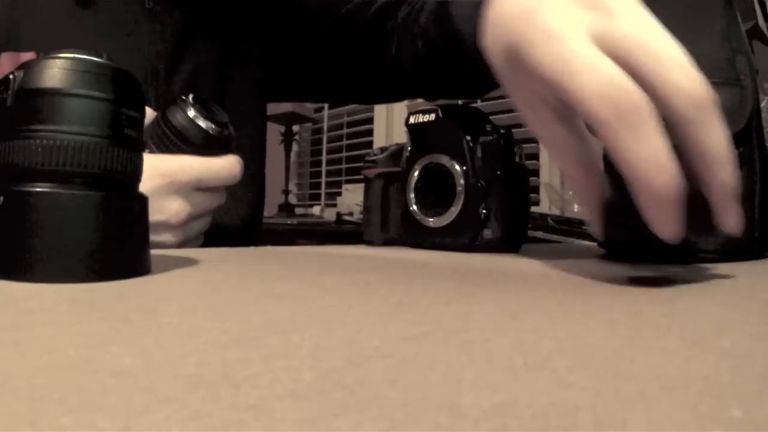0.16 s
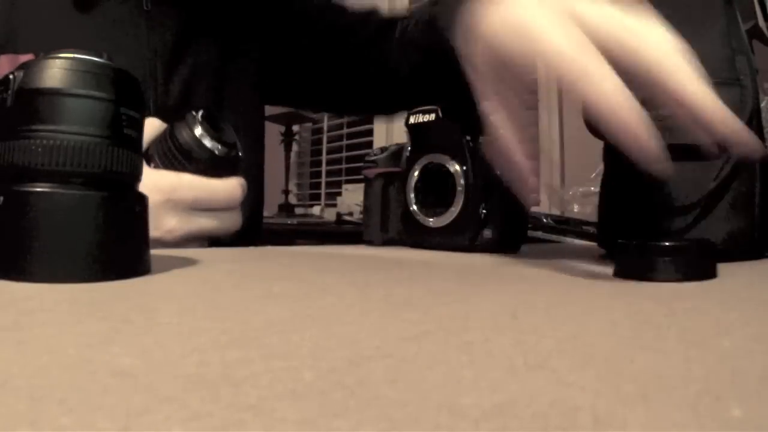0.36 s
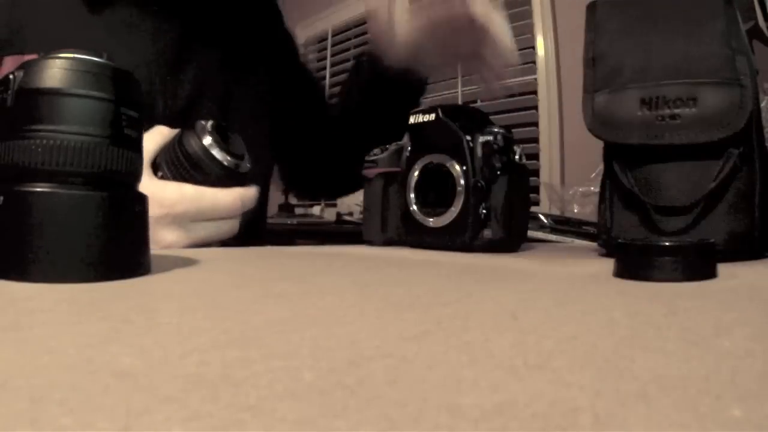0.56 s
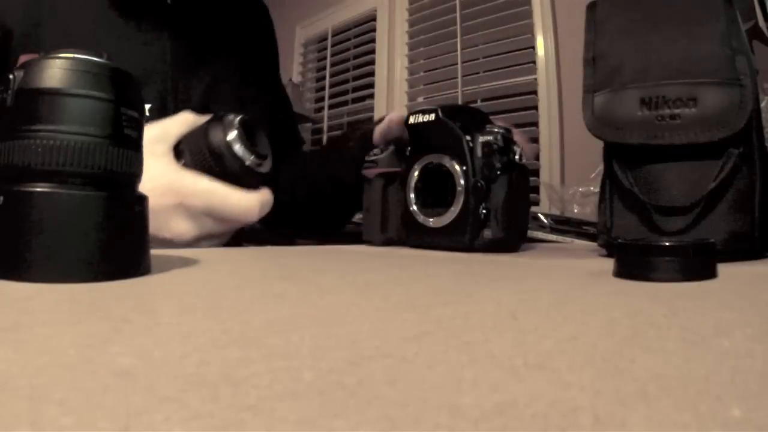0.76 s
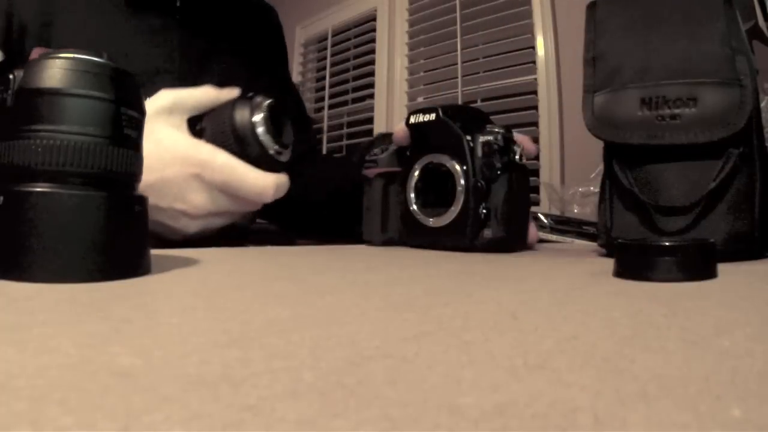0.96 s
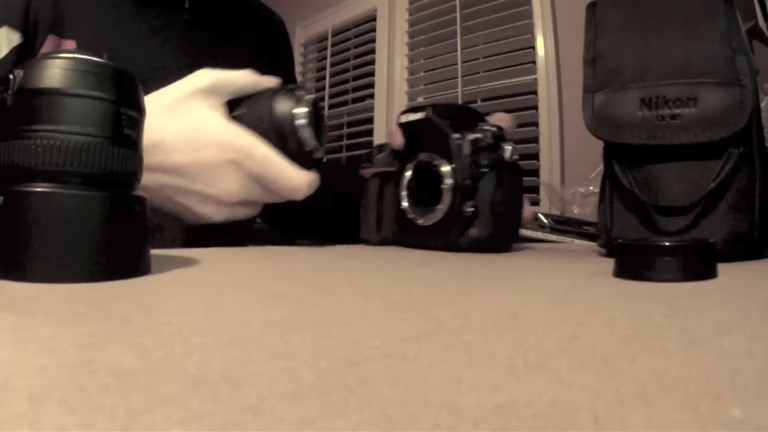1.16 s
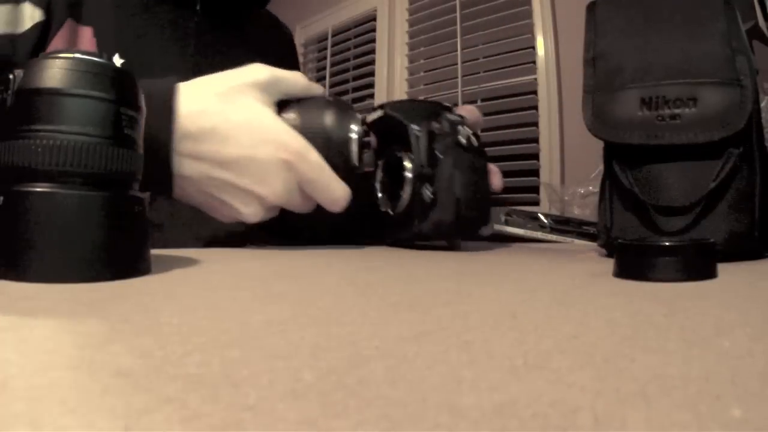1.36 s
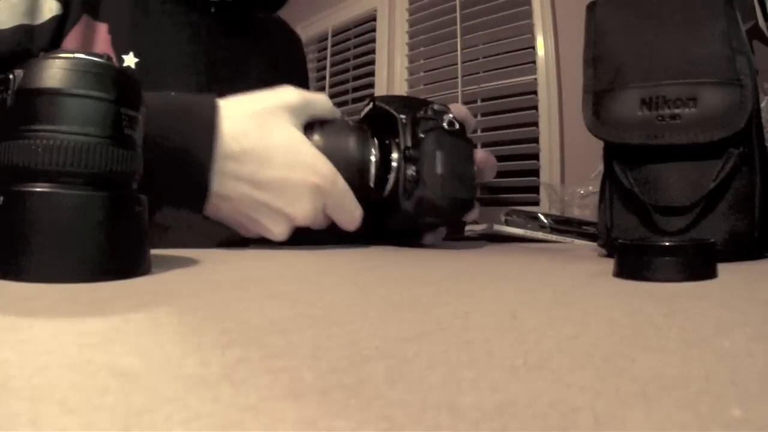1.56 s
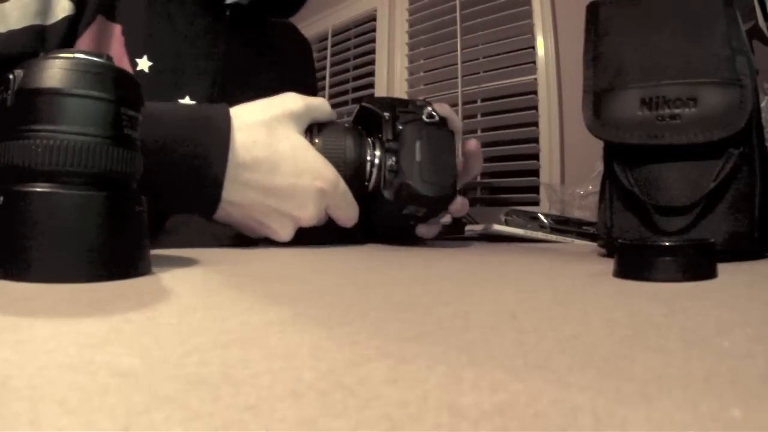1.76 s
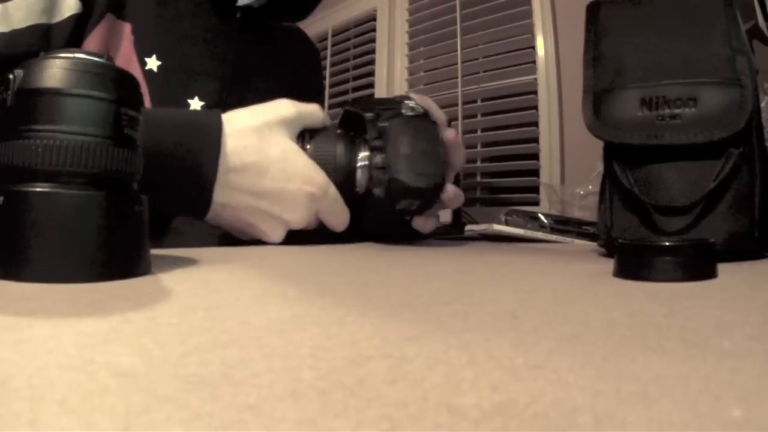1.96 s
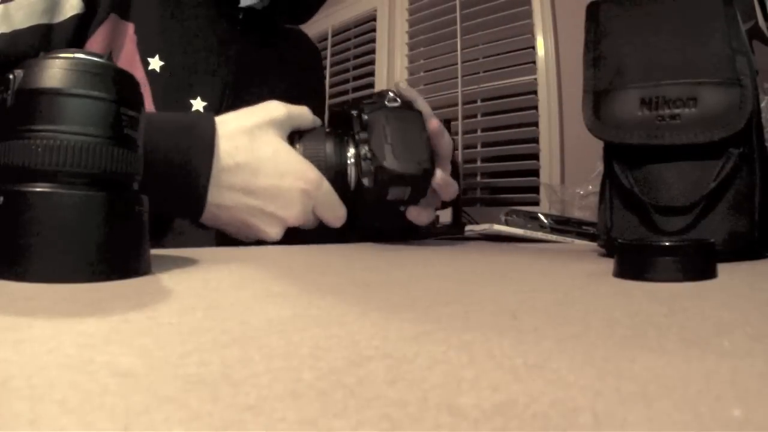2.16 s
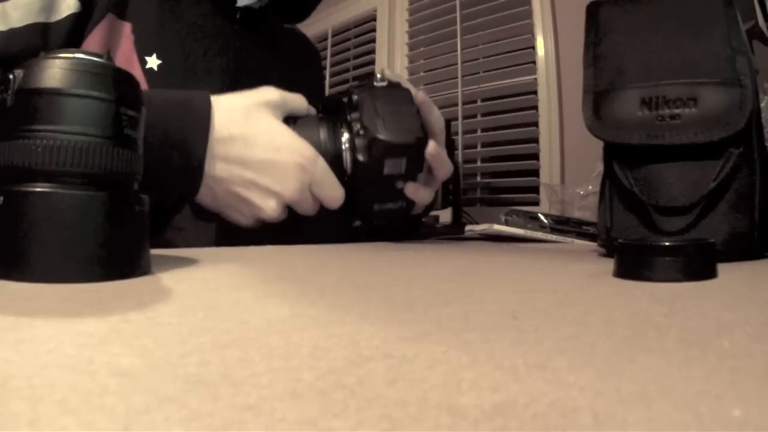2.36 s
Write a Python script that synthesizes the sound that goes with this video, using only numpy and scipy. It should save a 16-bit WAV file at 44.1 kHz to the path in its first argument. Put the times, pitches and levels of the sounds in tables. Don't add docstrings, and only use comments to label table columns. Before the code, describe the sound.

A lens being fitted to a camera, close up in a small room: first a sharp double cap clack, then faint handling, knocks, a loud cluster of clunks, and light taps over hiss and hum.

```python
import sys
import numpy as np
from scipy import signal
from scipy.fft import rfft, irfft
from scipy.io import wavfile
from scipy.ndimage import uniform_filter1d

SR = 44100
rng = np.random.default_rng(int(sys.argv[2]) if len(sys.argv) > 2 else 0)


def ratio_of_db(decibels):
    return 10 ** (np.asarray(decibels, float) / 20)


def unload_wav(signal):
    wavfile.write(
        sys.argv[1],
        SR,
        np.round(np.clip(np.atleast_2d(signal).T, -1, 1) * 32767).astype(np.int16),
    )


N = 105840

# hz, level_db (per Hz)
HISS_COLOUR = [(25, -3.5), (60, 6.5), (90, -1.5), (160, -2), (380, -4), (500, -9.5), (1500, -18.5),
               (6000, -28)]
# hz, t60_s
ROOM_DECAY = [(150, 0.2), (500, 0.41), (1000, 0.39), (2500, 0.34), (5000, .3)]
# start_s, length_s, level_db, dullness (0 bright to 1 dull)
RUB_STROKES = [(0, 0.6, -70, 1), (0.701, 0.17, -54, 0.41), (0.854, 0.11, -46.5, 0.58),
               (0.887, 0.025, -50, 0), (1.05, 0.079, -53.5, 0.5), (1.105, 0.072, -44, 0.26),
               (1.16, 0.24, -49.5, 0.36), (1.334, 0.18, -65.5, 0.42), (1.659, 0.068, -45, 0.5),
               (1.849, 0.17, -43, 0.17), (1.923, 0.033, -35.5, 0.2), (1.936, 0.031, -32.5, 0.84),
               (2.151, 0.087, -53.5, 0.63)]
# hz, level_db
BRIGHT_RUB = [(300, -19), (1300, -9.5), (3400, -8.5), (4700, -2), (6000, -2.5)]
# hz, level_db
DULL_RUB = [(100, -6.5), (400, 4.5), (650, -5.5), (1000, 2.5), (1400, -8), (2200, -6), (6000, -36.5)]
# start_s, length_s, level_db
DESK_PRESSES = [(0.764, 0.096, -41), (1.09, 0.19, -42.5), (1.287, 0.18, -46.5), (1.57, .17, -47),
                (1.859, 0.12, -33.5), (2.103, 0.042, -36)]
# pitch_hz, level_db, t60_s
DESK_MODES = [(74.3, 12.5, 0.05), (99.7, 9.5, 0.21), (189, -13.5, 0.09)]
# start_s, level_db
CAP_LANDINGS = [
    (.2212, -8),
    (.2254, -8),
    (.2855, -40),
]
# pitch_hz, level_db, t60_s
CAP_MODES = [(325.7, -1.5, .1), (630, -6.5, .08), (773, -16.5, 0.016), (883, 7, 0.022), (966, 2, 0.037),
             (1095, 1.5, 0.022), (1350, -9.5, 0.024), (1673, -18.5, .025), (2100, -32.5, 0.06),
             (3500, -12, .06), (4570, -31, 0.02)]
# start_s, level_db, rise_s
RIM_STRIKES = [
    (.2212, -17, .0005),
    (.2249, -10.5, .001),
    (.2816, -24, .01),
    (.3432, -43, .01),
    (.3846, -50, .01),
]
# pitch_hz, level_db, t60_s
RIM_MODES = [
    (2434, 0, .035),
    (2434, -4, .115),
]
# start_s, length_s, from_hz, to_hz, width_hz, level_db
MOUNT_SLIDE = (1.66, .045, 3300, 5200, 1500, -43)
# start_s, body_db, hardness_db (per octave), snap_db, desk_db
LENS_KNOCKS = [(0.759, -40, 3, -64, -36), (0.778, -37, 8, -62, -32.5), (1.566, -34, 7.5, -44.5, -23),
               (1.5698, -23, -6, -37.5, -22), (1.575, -41, 17, -39.5, -62), (1.6190, -11, 4, -27, -25.5),
               (1.6225, -25.5, 13, -25, -28), (1.644, -33, -2, -63, -29), (1.7, -18, -4.5, -32.5, -21),
               (1.875, -25.5, -11.5, -40, -34), (1.918, -25.5, -3, -56, -46),
               (1.9370, -5.5, -2.5, -20.5, -19), (1.9466, -12.5, 5.5, -17, -19),
               (1.9522, -20.5, 20.5, -32, -38), (1.9626, -4.5, -1, -17.5, -9), (1.9793, -5.5, 1, -20, -47),
               (2.086, -33, 0, -68, -58), (2.105, -42, -11.5, -68, -27), (2.112, -26, -6, -45, -32),
               (2.2629, -28.5, 1, -47, -72), (2.288, -40.5, -0.5, -72, -71), (2.3691, -31, -1.5, -44, -68)]
# pitch_hz, level_db, t60_s
BODY_MODES = [(261, -5, 0.028), (343.2, 4, 0.072), (388.4, 7.5, 0.0536), (498, -4.5, 0.11),
              (569.5, -5.5, 0.084), (760, -4, 0.056), (792, -5, 0.064), (850, -7, 0.069), (967, -9, 0.075),
              (1147, -13, 0.034), (1408, -7, 0.023)]
# hz, level_db
SNAP_COLOUR = [(200, -40), (900, -4.5), (1800, 5), (3300, -1), (4700, -1.5), (6000, -17.5)]
# start_s, level_db
DRY_TICKS = [(0.172, -41), (0.7034, -42.5), (0.7255, -42.5), (0.7366, -45), (0.8633, -62), (0.8853, -40.5),
             (0.9057, -35), (1.0702, -37), (1.1095, -48), (1.1422, -34), (1.657, -37), (1.854, -42.5),
             (1.861, -13), (2.1711, -40)]
# hz, level_db
TICK_COLOUR = [(200, -44), (1100, -29), (1700, -14.5), (2400, -13), (3400, -3.5), (4000, -6), (4750, -4),
               (6000, -15.5)]

HISS_DB, HUM_DB, HUM_LOW_DB = -54.5, -50.5, -63
HUM_HZ, HUM_WAVER = 120, .1
ROOM_DB, RIM_ROOM_DB = -10.5, -22
SLIPS_PER_S, SLIP_SPREAD_DB, SLIP_BED = 900, 3.5, .6
CAP_CRACK_DB, CAP_THUMP_DB = -13, -26
CONTACT_S, SOFTER_S_PER_DB = .0005, .00015
SCATTER_DB, DESK_RISE_S = 1.5, .008
SNAP_T60_S, TICK_T60_S, TICKS_DB = .013, .013, -1.5
BODY_CUT_HZ = 280
HOLD_HZ, FINE_HZ = 12000, 48000
LOW_CUT_HZ, EDGE_HZ, TOP_HZ = 35, 5600, 15320


def evened(x):
    return x / np.sqrt(np.mean(x ** 2) + 1e-20)


def read(points, hz):
    f, value = np.transpose(points)
    return np.interp(np.log(hz + 1), np.log(f + 1), value)


def coloured(x, points):
    gain = ratio_of_db(read(points, np.fft.rfftfreq(len(x), 1 / SR)))
    return irfft(rfft(x) * gain, len(x))


def add(mix, start_s, sound):
    part = mix[round(start_s * SR):][:len(sound)]
    part += sound[:len(part)]


def ring(modes, scatter_db=0, tilt_db=0, rise_s=.0001):
    t = np.arange(SR // 3)[:, None] / SR
    hz, db, t60 = np.transpose(modes)
    scatter = scatter_db * rng.standard_normal(len(hz))
    tilt = tilt_db * np.log2(hz / hz[1])
    gain = ratio_of_db(db + scatter + tilt)
    decay = ratio_of_db(-60 * t / t60)
    waves = gain * decay * np.sin(2 * np.pi * hz * t) * (1 - np.exp(-t / rise_s))
    return waves.sum(1) / np.linalg.norm(gain)


def crack(t60_s, colour):
    t = np.arange(2048) / SR
    noise = evened(coloured(rng.standard_normal(2048), colour))
    return noise * ratio_of_db(-60 * t / t60_s) * (1 - np.exp(-t / 0.00025))


def swell(length_s):
    u = np.arange(round(length_s * SR)) / (length_s * SR)
    return np.sin(np.pi * u ** 0.51)


def background():
    t = np.arange(N) / SR
    waver = 1 + HUM_WAVER * evened(uniform_filter1d(rng.standard_normal(N), size=3000))
    hum = ratio_of_db(HUM_DB) * waver * np.sin(2 * np.pi * HUM_HZ * t)
    hum += ratio_of_db(HUM_LOW_DB) * np.sin(np.pi * HUM_HZ * t)
    hiss = evened(coloured(rng.standard_normal(N), HISS_COLOUR))
    return np.sqrt(2) * hum + ratio_of_db(HISS_DB) * hiss


def room(x):
    taps = np.zeros(SR // 2)
    at = np.arange(200, SR // 2 - 20, 20)
    taps[at + rng.integers(0, 20, len(at))] = rng.choice([-1., 1.], len(at))
    hz, t, bands = signal.stft(taps, SR, nperseg=256)
    decay = ratio_of_db(-60 * t / read(ROOM_DECAY, hz)[:, None])
    tail = signal.istft(bands * decay, SR, nperseg=256)[1]
    return signal.fftconvolve(x, tail / np.linalg.norm(tail))[:N]


def hands():
    struck = rng.random(N) < SLIPS_PER_S / SR
    grains = struck * ratio_of_db(SLIP_SPREAD_DB * np.minimum(rng.exponential(1, N), 2))
    roughness = evened(signal.oaconvolve(grains, np.exp(-np.arange(200) / 40))[:N])
    slips = rng.standard_normal(N) * (SLIP_BED + roughness)
    bright = evened(coloured(slips, BRIGHT_RUB))
    dull = evened(coloured(slips, DULL_RUB))
    rubs = np.zeros(N)
    for start_s, length_s, db, dullness in RUB_STROKES:
        shape, share = swell(length_s), np.clip(dullness, 0, 1)
        texture = (1 - share) * bright + share * dull
        add(rubs, start_s, ratio_of_db(db) * shape * texture[round(start_s * SR):][:len(shape)])
    pushes = np.zeros(N)
    for start_s, length_s, db in DESK_PRESSES:
        add(pushes, start_s, ratio_of_db(db) * swell(length_s))
    low = evened(signal.oaconvolve(rng.standard_normal(N), ring(DESK_MODES))[:N])
    return rubs, pushes * low


def cap():
    clack, rim = np.zeros(N), np.zeros(N)
    for start_s, db in CAP_LANDINGS:
        add(clack, start_s, ratio_of_db(db) * ring(CAP_MODES))
        add(clack, start_s, ratio_of_db(db + CAP_CRACK_DB) * crack(0.025, SNAP_COLOUR))
    for start_s, db, rise_s in RIM_STRIKES:
        add(rim, start_s, ratio_of_db(db) * ring(RIM_MODES, rise_s=rise_s))
    return clack, rim


def slide():
    start_s, length_s, from_hz, to_hz, width_hz, db = MOUNT_SLIDE
    shape = swell(length_s)
    phase = 2 * np.pi * np.cumsum(np.linspace(from_hz, to_hz, len(shape))) / SR
    pole = np.exp(-np.pi * width_hz / SR)
    slow = signal.lfilter([1], [1, -2 * pole, pole ** 2], rng.standard_normal((2, len(shape))))
    squeak = evened(slow[0] * np.cos(phase) + slow[1] * np.sin(phase))
    out = np.zeros(N)
    add(out, start_s, ratio_of_db(db) * shape * squeak)
    return out


def camera():
    knocks, desk = np.zeros(N), np.zeros(N)
    for start_s, body_db, hard_db, snap_db, desk_db in LENS_KNOCKS:
        touch = np.hanning(round(SR * (CONTACT_S + SOFTER_S_PER_DB * max(-hard_db, 0))))
        body = np.convolve(ring(BODY_MODES, SCATTER_DB, hard_db, CONTACT_S), touch / touch.sum())
        add(knocks, start_s, ratio_of_db(body_db) * body)
        add(knocks, start_s, ratio_of_db(snap_db) * crack(SNAP_T60_S, SNAP_COLOUR))
        add(desk, start_s, ratio_of_db(desk_db) * ring(DESK_MODES, SCATTER_DB, rise_s=DESK_RISE_S))
    for start_s, db in DRY_TICKS:
        add(knocks, start_s, ratio_of_db(db + TICKS_DB) * crack(TICK_T60_S, TICK_COLOUR))
    add(desk, CAP_LANDINGS[0][0], ratio_of_db(CAP_THUMP_DB) * ring(DESK_MODES, rise_s=DESK_RISE_S))
    return knocks + slide(), desk


def scene():
    rubs, pushes = hands()
    clack, rim = cap()
    knocks, desk = camera()
    no_bass = signal.butter(2, BODY_CUT_HZ, "high", fs=SR, output="sos")
    near = signal.sosfilt(no_bass, clack + knocks + rubs)
    wet = ratio_of_db(ROOM_DB) * room(near + ratio_of_db(RIM_ROOM_DB) * rim)
    return (near + rim + wet + desk + pushes + background())[None]


def low_pass(x):
    return signal.sosfilt(signal.butter(12, 16470, fs=SR, output="sos"), x)


def record(dry):
    hz, t = np.fft.rfftfreq(N, 1 / SR), np.arange(N) / SR
    low_cut = hz ** 2 / (hz ** 2 + LOW_CUT_HZ ** 2)
    skirt = np.cos(np.pi / 2 * np.clip((hz - EDGE_HZ) / (HOLD_HZ - 2 * EDGE_HZ), 0, 1))
    narrow = irfft(rfft(dry) * low_cut * skirt, N)
    mirrored = narrow * (1 + 2 * np.cos(2 * np.pi * HOLD_HZ * t))
    hold = np.sinc(hz / HOLD_HZ) / np.sinc(hz / FINE_HZ)
    top_cut = 1 / np.sqrt(1 + (hz / TOP_HZ) ** 90)
    return low_pass(irfft(rfft(mirrored) * hold * top_cut, N))


dry = scene()
out = record(dry)
unload_wav(out)
```